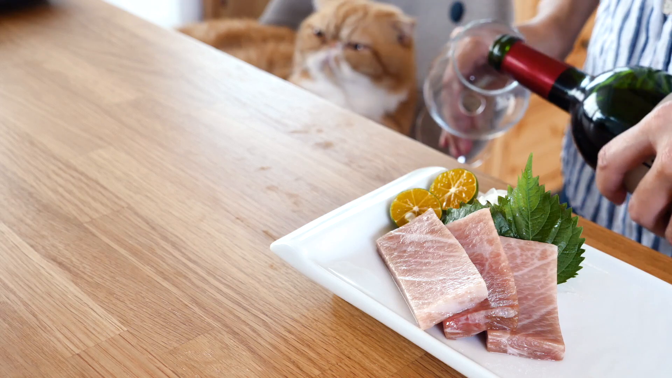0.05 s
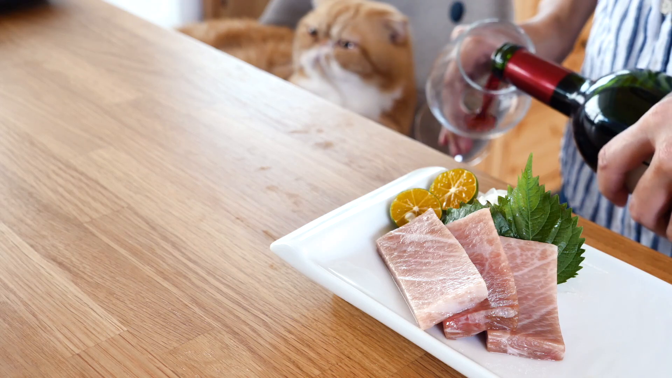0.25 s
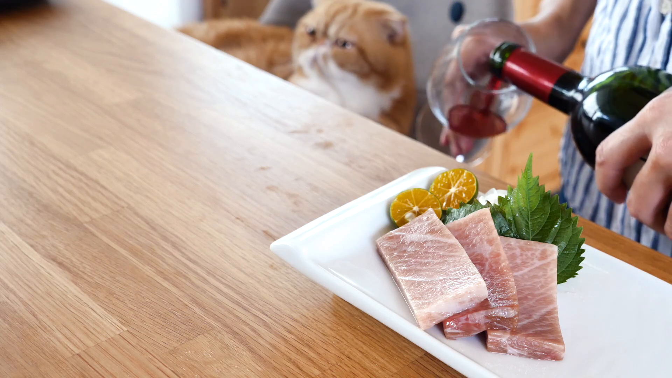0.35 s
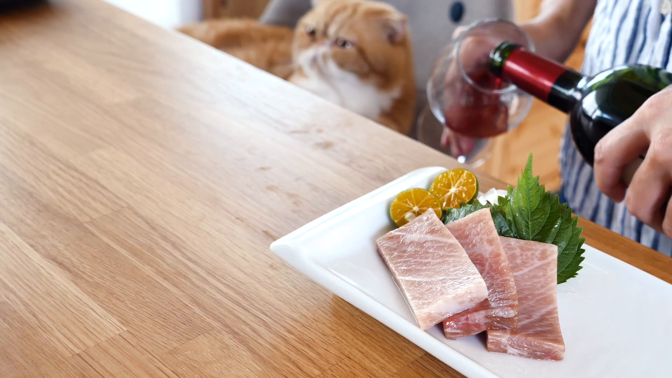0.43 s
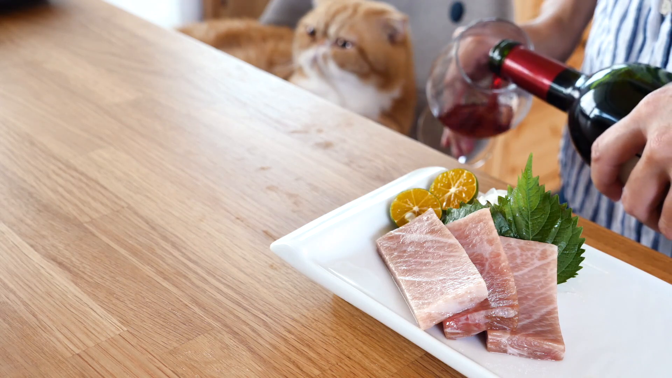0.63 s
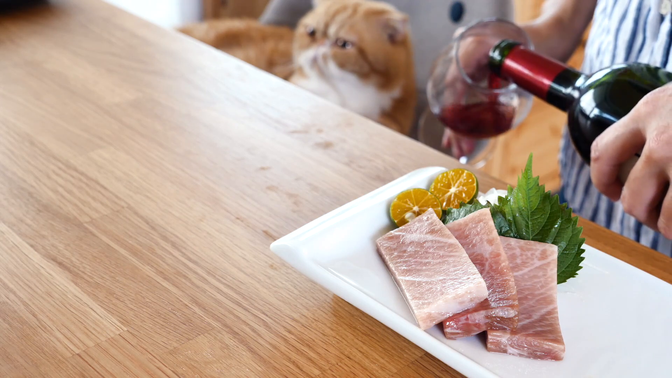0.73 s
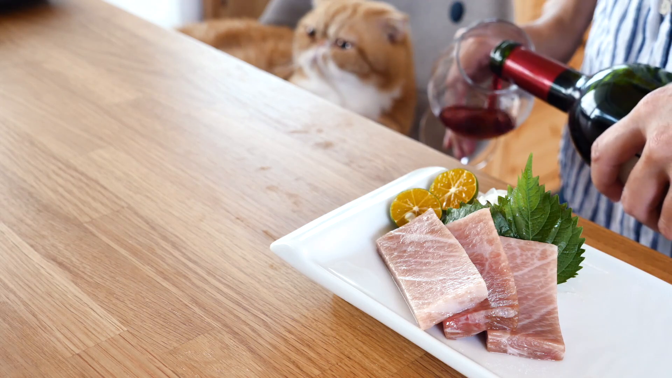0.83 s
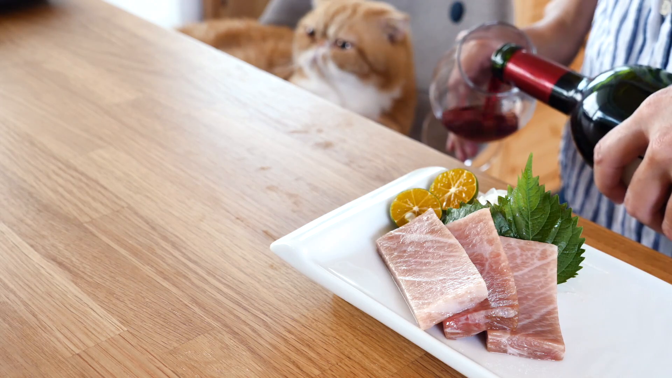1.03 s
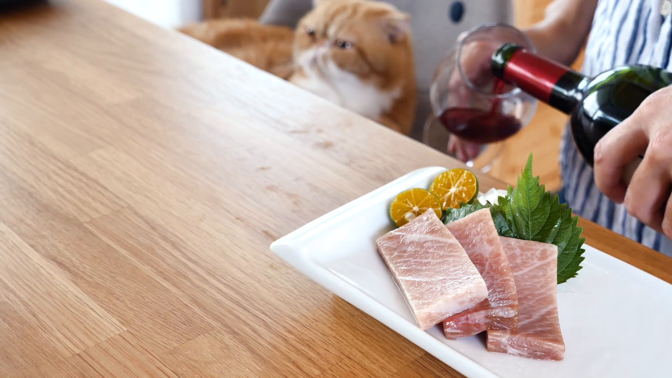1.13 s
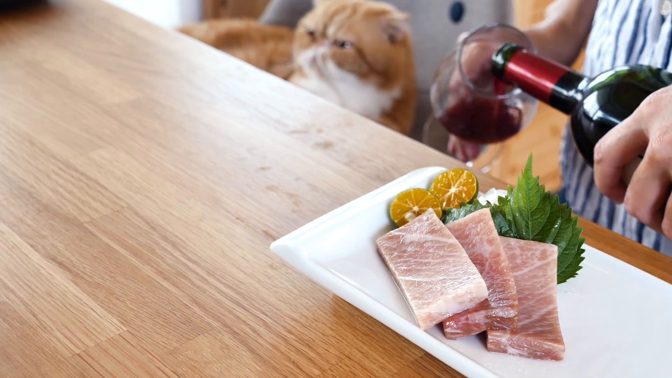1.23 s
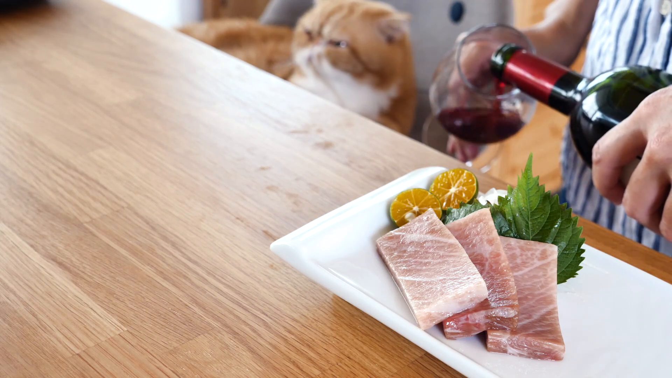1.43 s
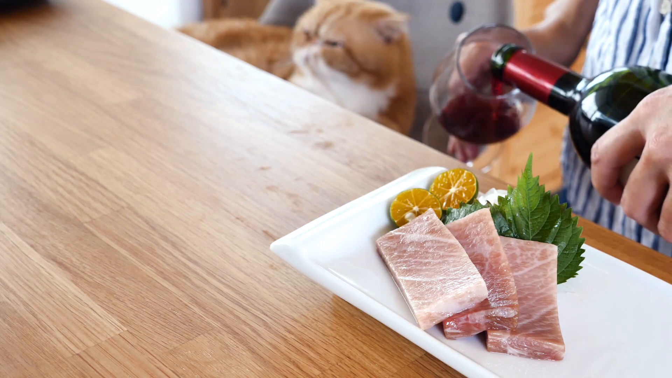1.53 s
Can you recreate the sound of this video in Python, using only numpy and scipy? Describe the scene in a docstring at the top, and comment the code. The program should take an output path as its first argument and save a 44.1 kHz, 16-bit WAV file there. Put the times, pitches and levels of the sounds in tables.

```python
"""A bottle's neck clinks once against a stemmed glass, which rings on in a small room, beating and wavering.
Soft pouring follows, with one small glug, a light sharp tick and a few tiny droplet ticks over a low rush of air.
The ring is a bank of paired, decaying modes; the knock and the tick's ring are struck sines.
The crack, tails and ticks are coloured noise bursts; the pour is many tiny ringing bubbles.
The room air is steady coloured noise."""
import sys
import numpy as np
from scipy import signal
from scipy.fft import rfft, irfft
from scipy.io import wavfile

SR = 44100
rng = np.random.default_rng(int(sys.argv[2]) if len(sys.argv) > 2 else 0)


def bounce(signal):
    """Save signal as a 16-bit WAV file at the path given by the first command-line argument."""
    frames = np.transpose(np.atleast_2d(signal))
    limited = np.clip(frames, -1, 1)
    pcm = np.round(limited * 32767).astype(np.int16)
    wavfile.write(sys.argv[1], SR, pcm)


N = 68355
TIME = np.arange(N) / SR  # seconds

# The glass's modes, each a beating pair. Each row: frequency in Hz, level in dB, swell in seconds,
# hold in seconds, 60 dB decay in seconds, beat rate in Hz, twin's amplitude as a share from 0 to 1.
GLASS_MODES = [(549.4, -22, .002, 0.0024, 0.12, 5, 0), (1211.3, -31, 0.034, 0.073, 0.45, 3, 0),
               (2458, -24.5, 0.0065, 0.035, 0.38, 4.6, 0.5), (2612, -27, 0.00092, 0.039, 0.4, 6.1, 0.62),
               (3181.6, -22, 0.087, 0.0073, 0.58, 9.4, 0.23), (3224, -24.5, 0.0015, 0.0033, 0.42, 15, 0.23),
               (3600, -30, 0.0034, 0.0046, 0.076, 5, 0.1), (3818, -28.5, 0.0019, 0.004, .26, 6.9, 0.18),
               (4490, -45, .003, .005, 0.36, 6, 0.4), (4740, -30.5, 0.0017, 0.0044, 0.15, 6, 0.13),
               (5130, -50, .003, .005, 0.27, 6, 0.2), (5450, -40, 0.0025, 0.0083, 0.54, 5.6, 0.7),
               (7200, -36.5, .003, 0.0044, 0.063, 6, 0.05), (7380, -38, 0.0033, .003, 0.37, 6.9, 0.67),
               (7670, -51, .003, .005, 0.29, 6, .3), (8281, -36.5, 0.0073, .008, 0.28, 8.1, .45),
               (9713, -31.5, 0.0026, 0.0033, 0.12, 17, 0.53), (9815, -44.5, .003, .005, 0.37, 12, .4),
               (10400, -52, .003, .005, .33, 7.4, .3), (11010, -57, .003, .005, .4, 7, .3),
               (12810, -51, .003, .005, .3, 7, .3), (13240, -53, .003, .005, .22, 7, .3),
               (14700, -49, .003, .005, .17, 7, .3)]
# The full bottle's quickly damped knock. Each row: frequency in Hz, level in dB, 60 dB decay in seconds.
BOTTLE_MODES = [(1910, -22, .022), (2070, -11.5, 0.019), (3200, -17.5, 0.068)]
# Colour of the contact's crack. Each row: frequency in Hz, relative level per Hz in dB.
CRACK_COLOUR = [(150, -31), (550, -9), (800, -20.5), (1400, -10), (2050, -2), (2500, -7), (2850, -21),
                (3400, 2.5), (3800, 1), (4300, -17), (5400, -13), (6400, -40), (7500, -14), (9800, -31),
                (11500, -35.5), (14000, -26), (16000, -44)]
# Colour of the crack's reverberation. Each row: frequency in Hz, relative level per Hz in dB.
TAIL_COLOUR = [(300, -29), (1200, -13.5), (2100, 2), (2800, -12), (3500, 5.5), (4500, -3.5), (6400, -22.5),
               (7800, -19), (11500, -32), (14000, -30), (16000, -36)]
# Colour of the light tick. Each row: frequency in Hz, relative level per Hz in dB.
TICK_COLOUR = [(1500, -25), (3000, -2), (4000, 6), (5000, -5), (6500, -3), (7600, -8), (8900, -6),
               (11000, -19.5), (16000, -17)]
# Colour of the tick's first instant. Each row: frequency in Hz, relative level per Hz in dB.
SNAP_COLOUR = [(1500, -15), (3000, -3), (6000, 0), (10000, -7), (16000, -8)]
# What the tick sets ringing. Each row: frequency in Hz, level in dB, 60 dB decay in seconds.
TICK_MODES = [(3994, -36, .08), (4570, -46, 0.16), (5001, -44, 0.11), (6080, -43.5, 0.063),
              (6710, -39.5, .04), (8680, -52, 0.054)]
# Tiny droplets. Each row: start in seconds, level in dB.
DROPLETS = [(1.198, -57.5), (1.342, -55.5), (1.462, -65)]
# Colour of the droplets. Each row: frequency in Hz, relative level per Hz in dB.
DROPLET_COLOUR = [(4000, -20), (9000, -1), (12000, 2), (16000, -9)]
# Single bubbles that stand out, the first two together a double-pitched glug.
# Each row: start in seconds, frequency in Hz, level in dB, 60 dB decay in seconds.
GLUGS = [(.69, 553, -34, .08), (.69, 1642, -34, 0.1), (1.406, 5800, -57, .06), (1.448, 5900, -51.5, .06),
         (1.531, 6200, -58, .05)]
# Colour of the room air. Each row: frequency in Hz, relative level per Hz in dB.
AIR_COLOUR = [(20, -38), (40, -23), (62, -7.5), (100, -9.5), (160, 0), (225, -1), (260, -3.5), (305, -0.5),
              (400, -7.5), (520, -10), (730, -13.5), (1000, -11), (1400, -13), (2000, -16.5), (2900, -24.5),
              (3850, -21), (4800, -32.5), (7000, -41), (10000, -46.5), (16000, -50)]

CLINK_S = 0.2173
SWELL_FROM_DB = -14.5  # a mode starts this far under its top
FLUTTER, FLUTTER_HZ, FLUTTER_BUILD_S = 0.29, 25, 0.063  # reflections make each ring waver
CRACK_DB, CRACK_T60_S = -16, 0.076
TAIL_DB, ROOM_T60_S = -31.5, 0.65
PING_ATTACK_S = 0.00041

TICK_S, TICK_DB, TICK_T60_S = 0.7523, -32.5, 0.021
TICK_TAIL_DB, TICK_TAIL_T60_S = -12, 0.17  # level relative to the tick
SNAP_DB, SNAP_T60_S = -34, 0.006
DROPLET_T60_S = 0.044

POUR_DB, BUBBLES_PER_S = -53.5, 160
BUBBLE_CYCLES = 15  # cycles a bubble takes to fall 60 dB
BUBBLE_SPREAD_DB = 1.5  # scale of the random rise in strength
BUBBLE_LOW_HZ, BUBBLE_HIGH_HZ = 822, 4280

AIR_DB = -38
CUTOFF_HZ = 15700


def glass_ring():
    """Each mode swells, holds and dies, beating with its twin and wavering more as reflections gather."""
    age = np.maximum(TIME - CLINK_S, 0)
    flutter_depth = FLUTTER * (1 - np.exp(-age / FLUTTER_BUILD_S))
    ring = np.zeros(N)
    for hz, db, swell, hold, t60, beat_hz, twin in GLASS_MODES:
        swell_db = SWELL_FROM_DB * np.maximum(1 - age / swell, 0)
        level = from_db(db + swell_db) * decay(CLINK_S, t60, swell + hold)
        beating = 1 + twin * np.exp(2j * np.pi * beat_hz * age)
        flutter = flutter_depth * (drift(FLUTTER_HZ) + 1j * drift(FLUTTER_HZ))
        carrier = np.exp(2j * np.pi * (hz * age + rng.random()))  # random starting phase
        ring += level * np.real((beating + flutter) * carrier)
    return ring


def contact():
    """The bottle's damped knock, the hard crack of glass on glass and its noise tail in the room."""
    knock = sum(ping(CLINK_S, *mode) for mode in BOTTLE_MODES)
    crack = from_db(CRACK_DB) * noise(CRACK_COLOUR) * decay(CLINK_S, CRACK_T60_S)
    tail = from_db(TAIL_DB) * noise(TAIL_COLOUR) * decay(CLINK_S, ROOM_T60_S)
    return knock + crack + tail


def pour():
    """Faint bubbles ring at random pitches once the neck rests on the rim; a few stand out."""
    strength_db = BUBBLE_SPREAD_DB * np.minimum(rng.exponential(1, N), 4)
    strength = from_db(strength_db) * rng.choice([-1, 1], N)
    born = (rng.random(N) < BUBBLES_PER_S / SR) & (TIME > CLINK_S)
    pitches = np.geomspace(BUBBLE_LOW_HZ, BUBBLE_HIGH_HZ, 20)
    pitch_index = rng.integers(0, len(pitches), N)
    bubbles = np.zeros(N)
    for k, hz in enumerate(pitches):
        # a two-pole resonator rings after each impulse dealt to its pitch
        radius = np.exp(-np.log(1000) * hz / (BUBBLE_CYCLES * SR))
        angle = 2 * np.pi * hz / SR
        impulses = strength * born * (pitch_index == k) + 1e-18  # tiny offset avoids denormals
        poles = [1, -2 * radius * np.cos(angle), radius * radius]
        bubbles += signal.lfilter([0, np.sin(angle)], poles, impulses)
    standouts = sum(ping(*bubble) for bubble in GLUGS)
    return from_db(POUR_DB) * rms_one(bubbles) + standouts


def light_tick():
    """A short bright noise burst with a sharper snap, a brief modal ring and a faint tail."""
    snap = from_db(SNAP_DB) * decay(TICK_S, SNAP_T60_S) * noise(SNAP_COLOUR)
    tail_level = from_db(TICK_TAIL_DB) * decay(TICK_S, TICK_TAIL_T60_S)
    level = from_db(TICK_DB) * (decay(TICK_S, TICK_T60_S) + tail_level)
    ring = sum(ping(TICK_S, *mode) for mode in TICK_MODES)
    return snap + level * noise(TICK_COLOUR) + ring


def droplets():
    """Each tiny droplet is a fast-dying burst of treble noise."""
    level = sum(from_db(db) * decay(start, DROPLET_T60_S) for start, db in DROPLETS)
    return level * noise(DROPLET_COLOUR)


def room_air():
    """A steady low rush, as coloured noise."""
    return from_db(AIR_DB) * noise(AIR_COLOUR)


def ping(start, hz, db, t60):
    """One struck sine with a very quick rise and an exponential decay."""
    rise = 1 - np.exp(-np.maximum(TIME - start, 0) / PING_ATTACK_S)
    tone = np.sin(2 * np.pi * hz * (TIME - start))
    return from_db(db) * rise * decay(start, t60) * tone


def decay(start, t60, hold=0):
    """Envelope: on at start, held, then falling 60 dB in each t60 seconds."""
    falling = np.maximum(TIME - start - hold, 0)
    return (TIME >= start) * np.exp(-np.log(1000) * falling / t60)


def noise(colour):
    """Steady noise of the given colour, at rms 1."""
    hz, db = np.transpose(colour)
    bins = np.maximum(np.arange(N // 2 + 1) * SR / N, 1)
    gain = from_db(np.interp(np.log(bins), np.log(hz), db))
    return rms_one(irfft(rfft(rng.standard_normal(N)) * gain, N))


def drift(rate_hz):
    """Slow random wander, noise rolled off above the given rate, at rms 1."""
    bins = np.arange(N // 2 + 1) * SR / N
    rolloff = 1 + (bins / rate_hz) ** 2
    return rms_one(irfft(rfft(rng.standard_normal(N)) / rolloff, N))


def rms_one(x):
    """Scale to unit power."""
    return x / np.sqrt(np.mean(x ** 2) + 1e-20)


def from_db(db):
    """Decibels to amplitude gain."""
    return 10 ** (np.asarray(db) / 20)


def scene():
    """Clink, pour, ticks and room air mixed to one channel."""
    mix = glass_ring() + contact() + pour() + light_tick() + droplets() + room_air()
    return mix[None]


def record(dry):
    """A steep elliptic low-pass cuts off the top of the treble."""
    lowpass = signal.ellip(10, .2, 80, CUTOFF_HZ, fs=SR, output="sos")
    return signal.sosfilt(lowpass, dry)


dry = scene()
out = record(dry)
bounce(out)
```